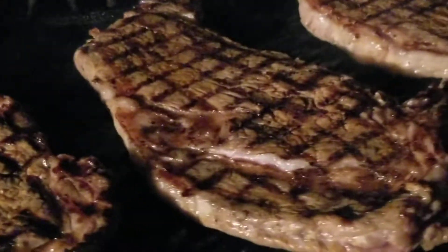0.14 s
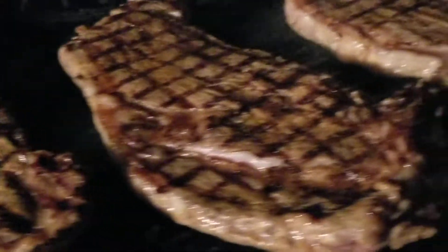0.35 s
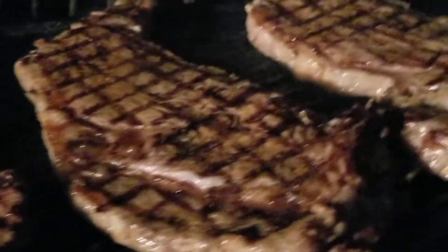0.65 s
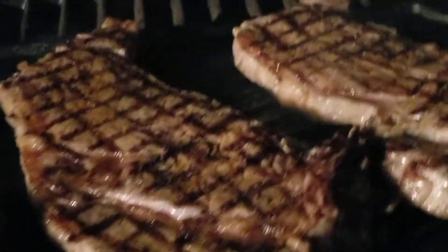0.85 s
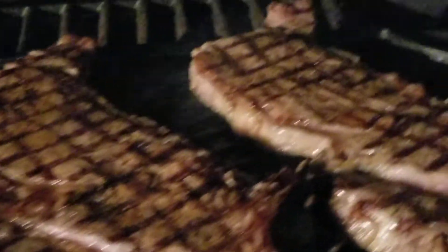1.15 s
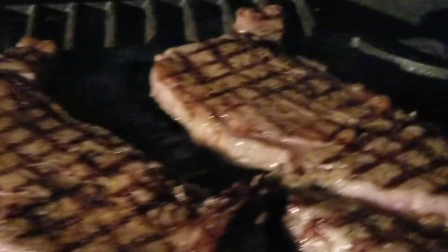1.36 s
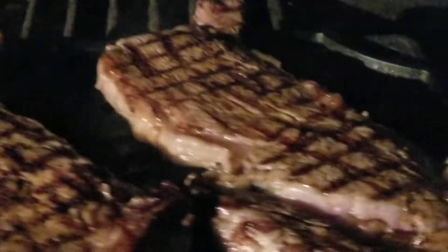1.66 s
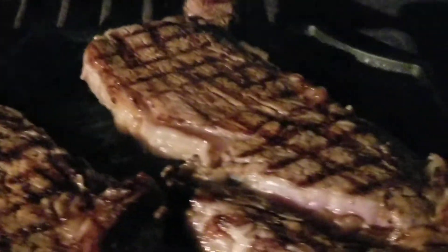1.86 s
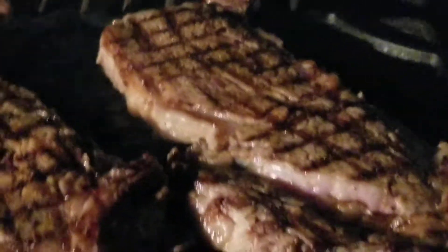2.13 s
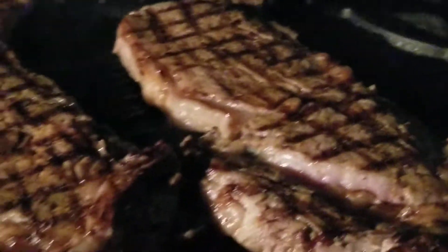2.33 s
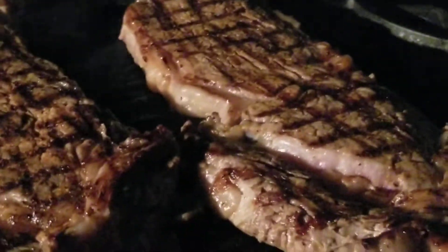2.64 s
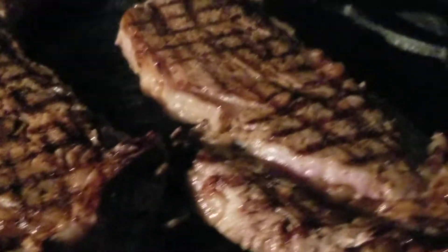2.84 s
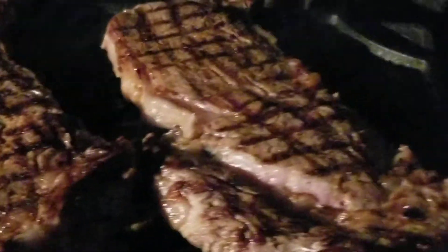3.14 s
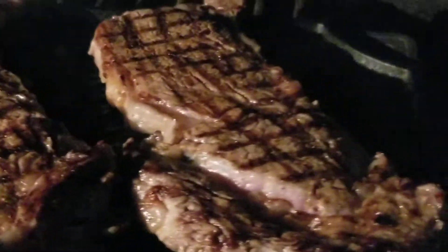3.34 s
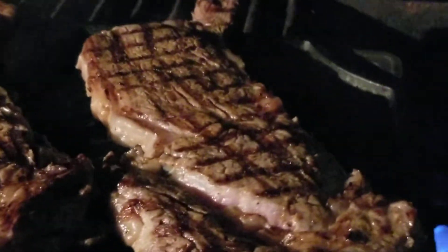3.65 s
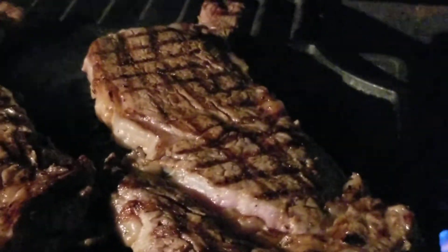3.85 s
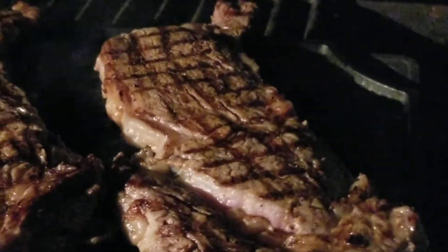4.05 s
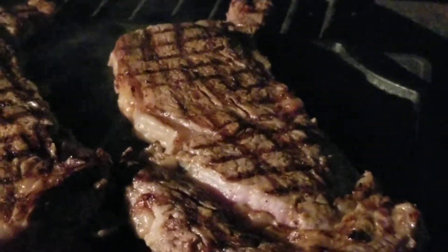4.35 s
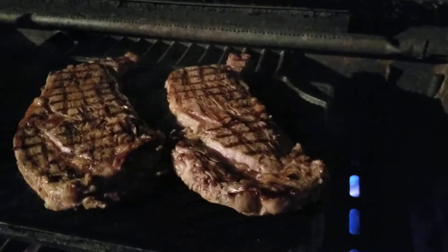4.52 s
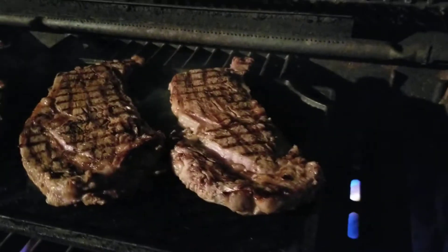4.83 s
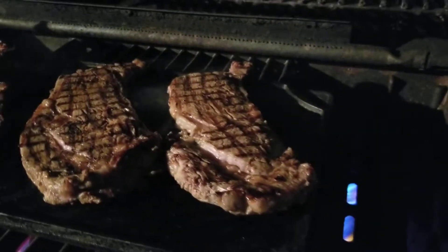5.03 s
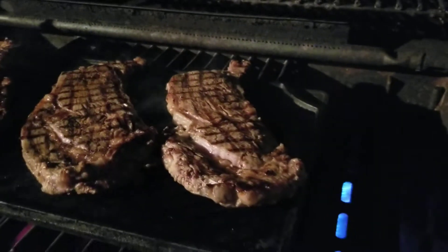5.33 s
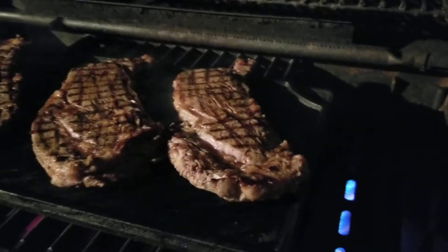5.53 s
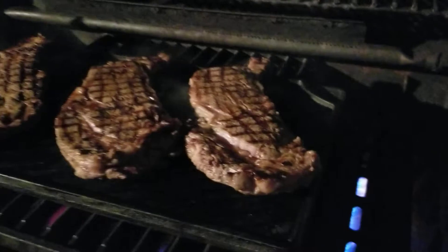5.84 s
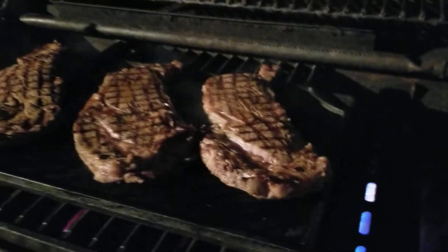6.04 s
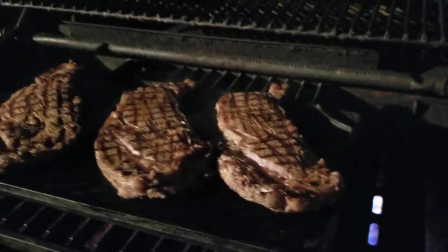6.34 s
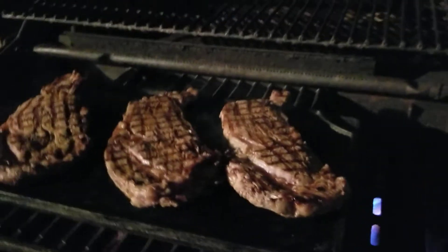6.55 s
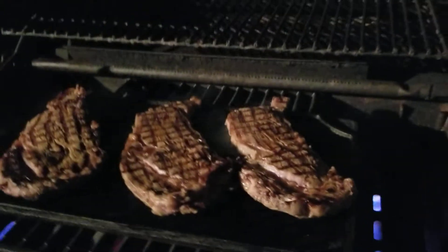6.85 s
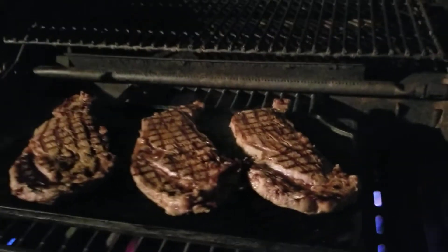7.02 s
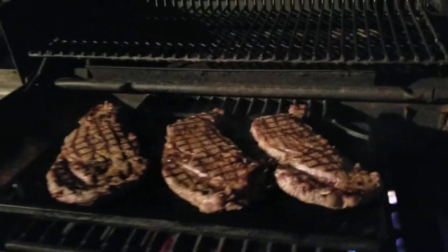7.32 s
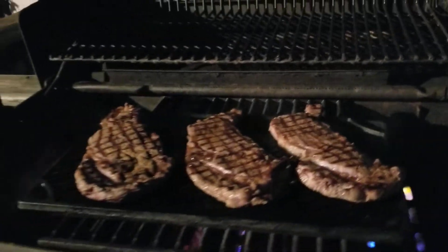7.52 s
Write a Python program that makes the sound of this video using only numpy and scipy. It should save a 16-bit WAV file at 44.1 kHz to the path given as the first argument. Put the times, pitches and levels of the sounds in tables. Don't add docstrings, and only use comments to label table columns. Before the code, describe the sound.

Steaks sizzle close by on a hot gas grill, bright hiss full of popping fat, sinking to a lull and swelling again over soft flame roar.

```python
import sys
import numpy as np
from scipy import signal
from scipy.fft import rfft, irfft
from scipy.io import wavfile
from scipy.ndimage import uniform_filter1d

SR = 44100
rng = np.random.default_rng(int(sys.argv[2]) if len(sys.argv) > 2 else 0)


def generate_wav(sig):
    pcm = np.round(np.clip(np.atleast_2d(sig).T, -1, 1) * 32767).astype(np.int16)
    wavfile.write(sys.argv[1], SR, pcm)


def ratio(d):
    e = np.asarray(d, float) / 20
    return 10 ** e


N = 338688


def evened(x):
    return x / np.sqrt(np.mean(x ** 2) + 1e-20)


def read(points, hz):
    f, value = np.transpose(points)
    return np.interp(np.log(hz + 1), np.log(f + 1), value)


def control(curve, t):
    return np.interp(t, *np.transpose(curve))


def sides(lean_db):
    return ratio(np.outer([.5, -.5], lean_db))


def coherent_pair(likeness, hz, late_s, frames):
    a, b, c, d = rng.standard_normal((4, len(hz), frames))
    same = np.clip(read(likeness, hz), 0, 1)[:, None]
    left, own = a + 1j * b, c + 1j * d
    delay = np.exp(-2j * np.pi * hz * late_s)[:, None]
    return np.array([left, same * left * delay + np.sqrt(1 - same ** 2) * own])


# t/s, level/dB
SIZZLE_LEVEL = [(0.0, -35), (0.34, -35), (0.62, -38.5), (1.86, -37.5), (2.41, -41.5), (2.87, -41),
                (3.12, -41.5), (3.36, -38.5), (3.89, -37.5), (4.21, -38), (4.68, -43.5), (4.9, -47),
                (5.73, -48), (6.44, -41), (6.67, -42), (7.04, -41), (7.34, -37.5), (7.68, -37.5)]
# t/s, lean to the left/dB
PHONE_AIM = [(0.0, -3.5), (0.6, -2.5), (2.9, -1.5), (3.9, -0.5), (5.7, 0), (6.7, -1), (7.68, -3.5)]


def sizzle():
    t = np.arange(N) / SR
    swell = spurts(t)
    both = swell * hiss(late_s=0.0002875, patchy_db=1.0, flicker_db=0.77)
    both = both + ratio(-6) * crackle(per_s=600, spread_db=4.5, clump=.4)
    body = signal.oaconvolve(both, signal.firwin(63, 8500, fs=SR)[None], "same", axes=1)
    fizz_gain = ratio(2.37) / swell ** 0.27
    played = body + (both - body) * fizz_gain
    return played * ratio(control(SIZZLE_LEVEL, t) + 12.0) * sides(control(PHONE_AIM, t))


# t/s, swell/dB, rise/ms, fall/ms
JUICE_SPURTS = [(.161, 3, 3.3, 5), (.297, 2.5, 8.7, 11), (1.445, 0, 15, 20), (1.78, 8, 2.7, 7),
                (1.965, -2, 10, 10), (2.456, 5, 4.4, 9.2), (3.838, 8.5, 8, 13), (3.877, 8, 4, 20),
                (4.7, 3, 13, 16), (4.741, 5, 3, 2.5), (5.13, 2.5, 8.8, 22), (5.912, 3, 3, 60),
                (6.278, 6, 6, 4.5), (6.302, 14.5, 4, 5.1), (6.7, 8.5, 4.7, 7.9), (7.16, 7.5, 16, 53),
                (7.244, 4, 8.7, 22), (7.32, 0, 4, 10)]


def spurts(t):
    s, db, rise_ms, fall_ms = np.transpose(JUICE_SPURTS)[..., None]
    shape = np.exp(np.minimum((t - s) / (rise_ms / 1000), (s - t) / (fall_ms / 1000)))
    return ratio((db * shape).sum(0))


# f/Hz, coherence/1
HISS_COHERENCE = [(500, 0.69), (1100, 0.65), (1600, 0.096), (4500, 0.14), (9000, 0.25)]


def hiss(late_s, patchy_db, flicker_db):
    frames, hz = N // 64 + 5, np.fft.rfftfreq(256, 1 / SR)
    patches = rng.standard_normal((len(hz), frames))
    patches = evened(uniform_filter1d(uniform_filter1d(patches, 9, 0), 40, 1))
    flicker = np.zeros(frames)
    for size in (4, 16, 64):
        flicker += uniform_filter1d(rng.standard_normal(frames), size) * np.sqrt(size)
    z = coherent_pair(HISS_COHERENCE, hz, late_s, frames)
    z = z * ratio(patchy_db * patches + flicker_db * evened(flicker))
    return evened(signal.istft(z, nperseg=256, noverlap=192)[1][:, :N])


def crackle(per_s, spread_db, clump, count=24):
    pitch, span, late, lean = rng.random((count, 4)).T
    low_hz = 3500 * 2.7 ** pitch
    top_hz, late_s = low_hz * 1.15 * 5.5 ** span, .00062 * late - .00005
    burst = bubbles(low_hz, top_hz, late_s, tail_db=-25, tail_s=.003, clap_db=-10)
    burst = burst * sides(7 * (lean - .5)).T[..., None]
    busy = np.exp(clump * evened(uniform_filter1d(rng.standard_normal(N // 64 + 1), 14)))
    chance = np.repeat(busy / busy.mean(), 64)[:N] * per_s / SR
    size = ratio(spread_db * np.minimum(rng.exponential(1, N), 3.1))
    size = size * (rng.random(N) < chance) * rng.choice([-1, 1], N)
    place = rng.integers(0, count, N)
    out = np.zeros((2, N))
    for k in range(count):
        out += signal.oaconvolve((size * (place == k))[None], burst[k], axes=1)[:, :N]
    return evened(out)


# f/Hz, level/dB
GRATE_ECHO_DIP = [(6500, 0), (8800, -6), (11500, 0)]


def bubbles(low_hz, top_hz, late_s, tail_db, tail_s, clap_db):
    t, f = np.arange(1024) / SR, np.fft.rfftfreq(1024, 1 / SR)
    low, top = 1j * f / low_hz[:, None], 1j * f / top_hz[:, None]
    ring = (low ** 2 / (1 + 1.0 * low + low ** 2) / (1 + 0.75 * top + top ** 2)) ** 2
    faint_tick = ratio(-20) * 3 * low / (1 + 3 * low)
    ring = (ring + faint_tick) * ratio(read(GRATE_ECHO_DIP, f))
    steps, scatter = rng.standard_normal((2, len(low_hz), 2, 1024))
    clap = rfft((t == 0) + (steps[:, :1] + steps) * ratio(clap_db) * np.exp(-t / 0.00025))
    clap = clap / abs(clap) ** .75
    tail = rfft(scatter * ratio(tail_db) * np.exp(-t / tail_s) * (t > .0006))
    port_late_s = np.stack([0 * late_s, late_s], 1)[..., None]
    delay = np.exp(-2j * np.pi * f * (port_late_s + 32 / SR))
    burst = irfft(ring[:, None] * (clap + tail) * delay * (f < 16800))
    return burst / np.linalg.norm(burst[..., :160], axis=-1, keepdims=True)


# t/s, energy level/dB, pitch f/Hz, lean to the left/dB
JUICE_BURSTS = [(0.032, -1, 1450, 0), (0.2172, 4, 1370, -16), (0.2963, 2.7, 1600, -1.4),
                (0.917, -3, 2060, -9), (1.1374, 0, 3120, -5), (1.3567, -6, 1310, -10),
                (1.443, 1.5, 2740, -3), (1.7792, -1, 850, 2.6), (1.7815, 2, 940, 5), (1.9587, 3, 1800, 3.1),
                (1.9716, 4.5, 2930, 1), (2.0032, 2, 2700, 2), (2.208, 1.5, 2320, -4),
                (2.2704, 3.5, 1710, -1), (2.459, -2, 2550, -3), (2.7632, 3.5, 4000, -8),
                (2.9624, -3, 1790, -13), (3.1126, 4, 1800, -10), (3.874, 8.5, 1970, -2),
                (3.8756, 0, 1430, -4.5), (3.878, 5, 1100, 3), (3.9991, -4, 2250, 0),
                (4.4763, -4, 1300, -1.1), (5.9854, -6.5, 2130, 6.1), (6.177, -15, 2260, 5),
                (6.3049, -6, 2040, -14), (6.6971, -7, 950, -3), (7.1327, 1, 1000, -6),
                (7.165, -1.4, 1610, 1)]
# t/s, energy level/dB, top edge f/Hz, lean to the left/dB
FAT_SNAPS = [(0.0562, -5, 9010, -9.9), (0.1616, 0, 7000, -11), (0.3454, -3, 6670, -10),
             (0.5429, 10, 11000, -5), (0.5648, 5.5, 14400, -12), (0.6354, 0.5, 15690, -14),
             (0.6584, 6.5, 16000, -12), (0.985, -10, 8500, -7), (1.2416, 4.5, 16560, 0.4),
             (1.2868, -2, 19000, -6), (1.3973, 0, 19000, -1), (1.5435, 2, 12900, -10),
             (2.0829, -1.4, 16300, -15), (2.182, 3, 19000, 1), (2.5766, -3.4, 16610, -10),
             (3.706, 3.5, 16000, -1), (3.9734, 1.5, 13900, 5), (4.235, 0, 17120, 10),
             (4.238, 0.5, 15420, 1.8), (4.3043, 0, 11100, 4.8), (4.3507, 3.5, 19000, 1),
             (4.6023, 0.5, 18830, 2), (4.7018, 0, 10700, 14), (4.7407, -4.5, 9020, 1),
             (5.5537, 3.5, 10500, -5), (5.9084, 9, 18000, -8), (5.931, -1, 15410, -5),
             (6.928, -10, 18290, 4), (7.319, 1.5, 10750, 0), (7.5244, 2, 19000, -4.2)]
# t/s, energy level/dB, pitch f/Hz, lean to the left/dB
SHADED_POPS = [(0.1835, 12.5, 4270, 0), (0.2216, -9, 4380, 8), (3.9144, -2, 1410, 0),
               (4.024, -1.2, 1500, 3), (4.3282, -5.5, 4940, 4.1), (4.37, -5, 5200, 2),
               (5.1257, -17, 1640, 3), (5.4215, -11.3, 3160, 5), (4.1461, -1.5, 4660, 1),
               (7.088, -6, 4300, 1), (7.3249, -5, 4900, -1.4), (7.1549, -2.2, 1690, 6.5),
               (7.204, -1, 1470, -0.5)]
# t/s, energy level/dB, lean to the left/dB
THIN_TICKS = [
    (2.2411, 0, -5.3),
    (2.9423, 3.7, -2),
    (3.6358, 2, 2),
    (3.9463, -4, 3.5),
    (4.261, 1, 5),
    (6.0261, -10, 11),
    (6.164, -5, 5),
    (7.1789, 10, -10),
    (7.3465, -1.8, 1),
]


def pops():
    # t/s, energy/dB, pitch/Hz, top edge/Hz, lean to the left/dB, right port late/ms
    rows = [(s, db, hz, 13000, lean, 0.289) for s, db, hz, lean in JUICE_BURSTS]
    rows += [(s, db, 4800, top, lean, 0.0) for s, db, top, lean in FAT_SNAPS]
    rows += [(s, db, hz, 4900, lean, 0.506) for s, db, hz, lean in SHADED_POPS]
    rows += [(s, db, 8300, 14400, lean, 0.24) for s, db, lean in THIN_TICKS]
    s, db, low_hz, top_hz, lean_db, late_ms = np.transpose(rows)
    burst = bubbles(low_hz, top_hz, late_ms / 1000, tail_db=-26, tail_s=0.0043, clap_db=-10.5)
    burst = burst * ratio(.7 + db)[:, None, None] * sides(lean_db).T[..., None]
    out = np.zeros((2, N + 1024))
    starts = np.round(s * SR).astype(int) - 32
    for start, sound in zip(starts, burst):
        out[:, start:start + 1024] += sound
    return out[:, :N]


# t/s, push level/dB, sign/1, port (0 left, 1 right), let-go time/ms
DROPLETS = [
    (.2172, -11.5, -1, 1, 1.5),
    (.3054, -20, -1, 1, 1.3),
    (4.3504, -21, -1, 0, 1.4),
    (4.7016, -27, 1, 0, 2.2),
    (4.7172, -31, -1, 0, 1.2),
]


def droplet_thuds(low_cut_hz):
    out, t = np.zeros((2, N)), np.arange(4000) / SR
    low_cut = signal.butter(2, low_cut_hz, "high", fs=SR)
    for s, db, sign, port, let_go_ms in DROPLETS:
        push = np.sign(sign) * ratio(db) * np.exp(-t / (let_go_ms / 1000)) * (1 - np.exp(-t * 16000))
        out[round(port), round(s * SR):][:len(t)] += signal.lfilter(*low_cut, push)
    return out


# level/dB, f/Hz, reverberation time T60/s, lean to the left/dB
FIRE_BOX_KNOCK = (-30, 170, .045, 4)


def knock(at_s):
    out, t = np.zeros((2, N)), np.arange(4000) / SR
    db, hz, t60, lean_db = FIRE_BOX_KNOCK
    ring = -ratio(db - 60 * t / t60) * np.sin(2 * np.pi * hz * t) * (1 - np.exp(-t / 0.0021))
    out[:, round(at_s * SR):][:, :len(t)] += ring * sides(lean_db)
    return out


# f/Hz, level/dB per Hz
FLAME_SPECTRUM = [(12, -43), (20, -15), (106, 2.5), (172, -0.5), (286, -11.5), (393, -9.5), (440, -14.5),
                  (468, -11), (507, -11), (755, -10.5), (900, -10), (1170, -14.5), (1980, -120)]
# f/Hz, coherence/1
FLAME_COHERENCE = [(60, 0.96), (270, 0.94), (450, 0.99), (900, 0.58)]


def roar(late_s, lean_db, lumpy_db):
    frames, hz = N // 512 + 5, np.fft.rfftfreq(2048, 1 / SR)
    lumps = rng.standard_normal((len(hz), frames))
    lumps = evened(uniform_filter1d(uniform_filter1d(lumps, 12, 0), 3, 1))
    z = coherent_pair(FLAME_COHERENCE, hz, late_s, frames)
    z = z * ratio(read(FLAME_SPECTRUM, hz)[:, None] + lumpy_db * lumps)
    flames = evened(signal.istft(z, nperseg=2048, noverlap=1536)[1][:, :N])
    t = np.arange(N) / SR
    follow_db = 0.94 * (control(SIZZLE_LEVEL, t) + 40)
    nearer_db = 0.5848 * t
    return flames * ratio(-57.5 + follow_db + nearer_db) * sides(lean_db)


def causal(points):
    log_gain = read(points, abs(np.fft.fftfreq(4096, 1 / SR))) * np.log(10) / 20
    return np.fft.ifft(np.exp(np.conj(signal.hilbert(log_gain)))).real[:1024]


# f/Hz, level/dB
LEFT_COLOUR = [(300, -16), (550, -21.5), (800, -15), (1200, -16), (1400, -10), (2200, -6), (3200, -3.5),
               (4500, -1.5), (5600, -3), (7000, -7), (8000, -7.5), (9500, -5), (11500, -3), (15600, -6)]
# f/Hz, level/dB
RIGHT_COLOUR = [(300, -21), (650, -30.5), (1000, -20.5), (2600, -16), (3200, -13.5), (4300, -3),
                (5400, -6.5), (6100, -6), (6900, -12.5), (8000, -5), (9500, -16.5), (11000, -29),
                (13200, -14.5), (15600, -26)]


def scene():
    ports = np.array([causal([(60, -56.5)] + LEFT_COLOUR), causal([(60, -71)] + RIGHT_COLOUR)])
    meat = signal.oaconvolve(sizzle() + pops(), ports, axes=1)[:, :N]
    thumps = droplet_thuds(low_cut_hz=40) + knock(at_s=3.9685)
    return meat + thumps + roar(late_s=0.00019, lean_db=4.0, lumpy_db=1.5)


def band_limit(x):
    return signal.sosfilt(signal.butter(12, 16990, fs=SR, output="sos"), x)


def record(dry):
    low_pass = signal.firwin(511, 15750, window=("kaiser", 9), fs=SR)
    limited = signal.oaconvolve(dry, low_pass[None], "same", axes=1)
    power = dry ** 2
    sharp = uniform_filter1d(power, size=64) > 25 * uniform_filter1d(power, size=8192)
    opened = np.minimum(4 * uniform_filter1d(sharp * 1., size=128), 1)
    heard = limited + opened * (dry - limited)
    heard = heard / (1 + (abs(heard) / .95) ** 6) ** (1 / 6)
    return band_limit(heard)


dry = scene()
out = record(dry)
generate_wav(out)
```